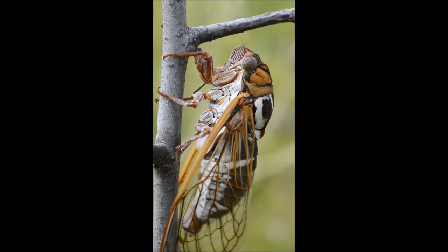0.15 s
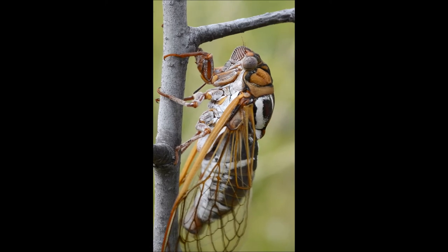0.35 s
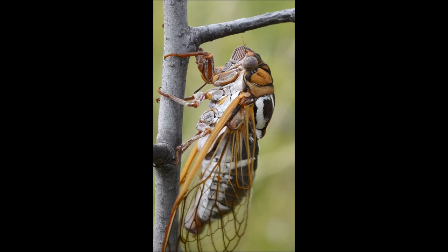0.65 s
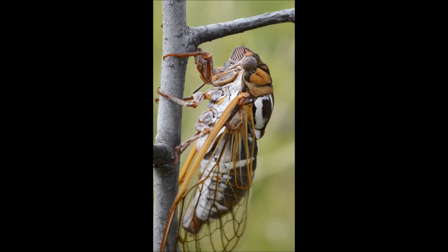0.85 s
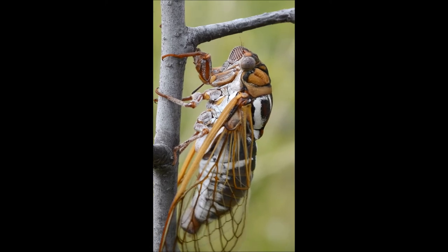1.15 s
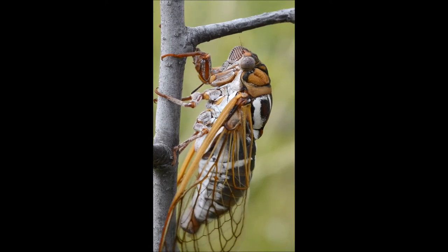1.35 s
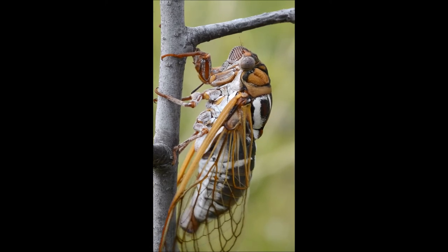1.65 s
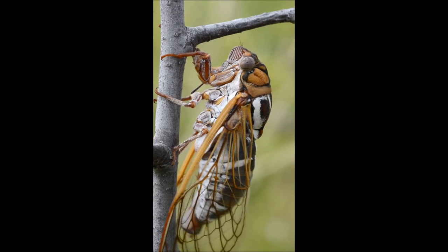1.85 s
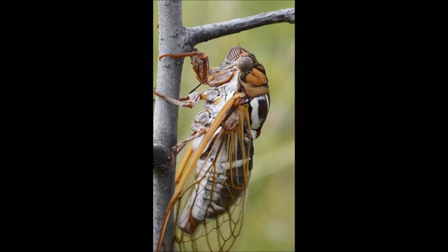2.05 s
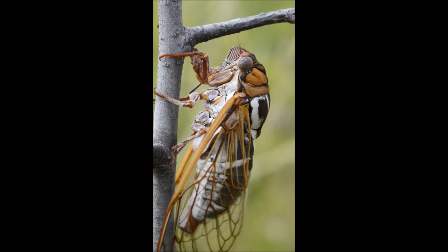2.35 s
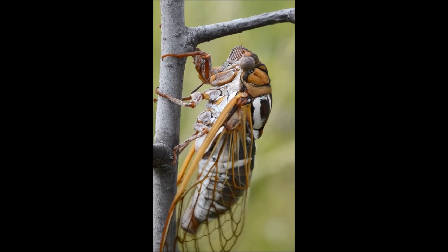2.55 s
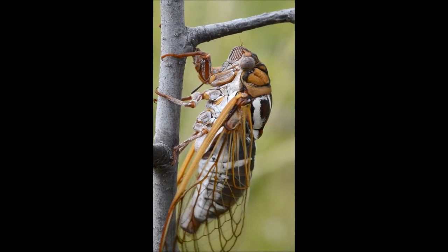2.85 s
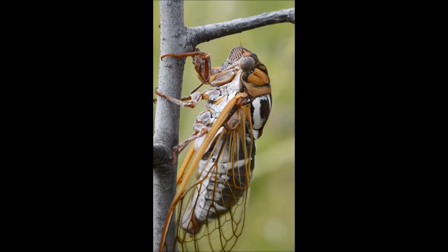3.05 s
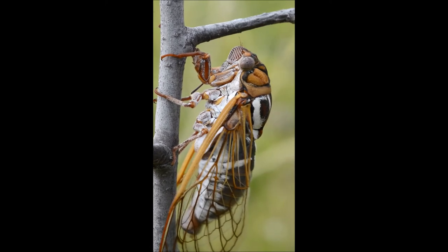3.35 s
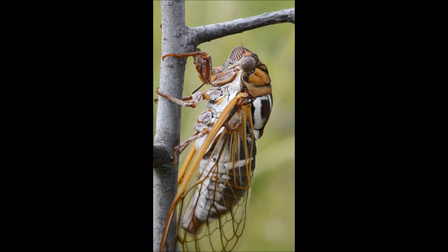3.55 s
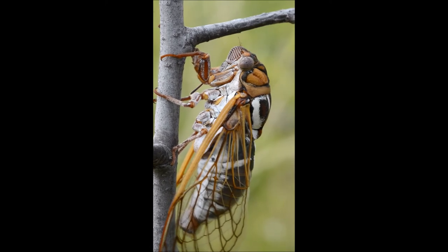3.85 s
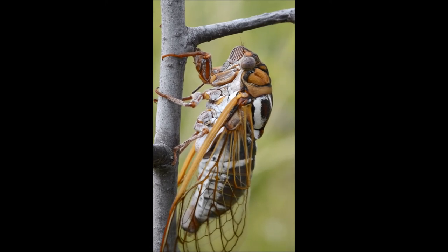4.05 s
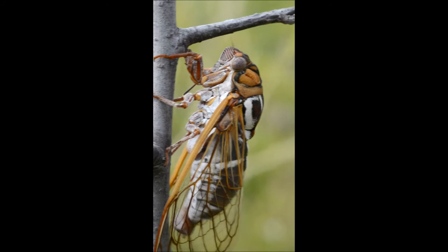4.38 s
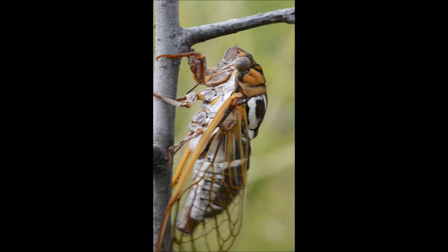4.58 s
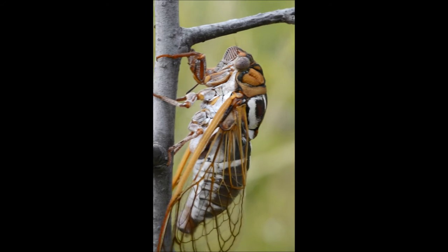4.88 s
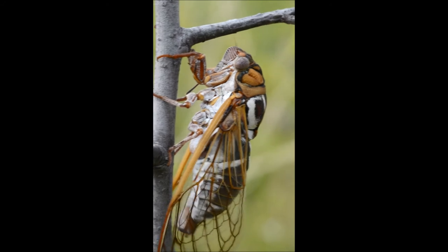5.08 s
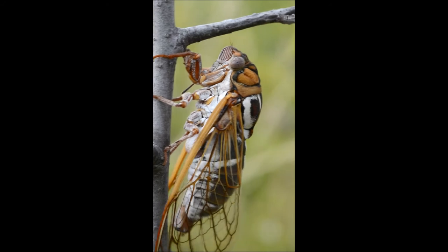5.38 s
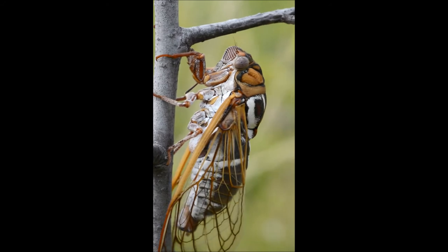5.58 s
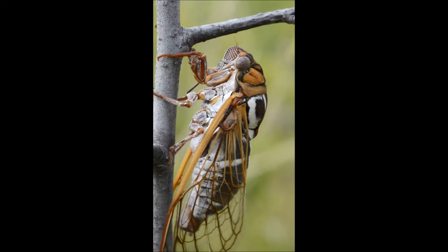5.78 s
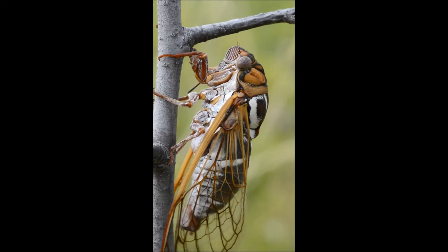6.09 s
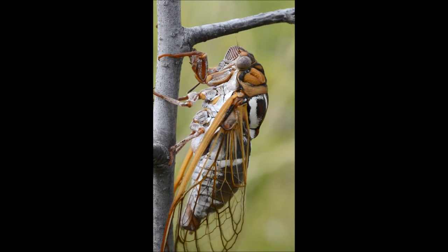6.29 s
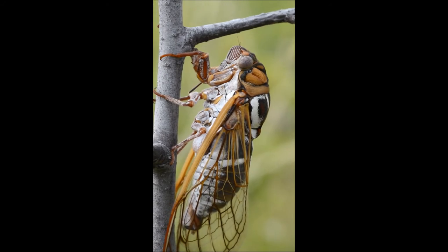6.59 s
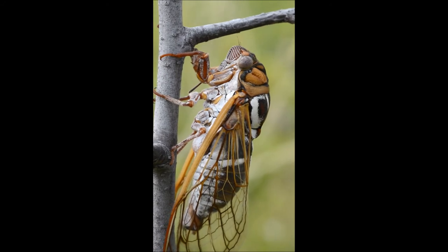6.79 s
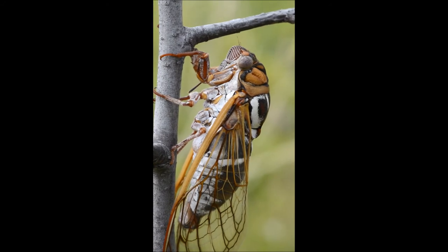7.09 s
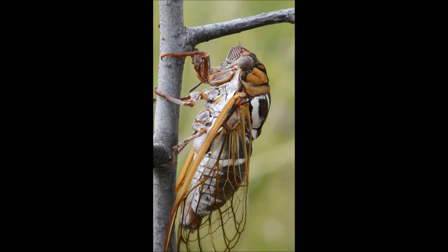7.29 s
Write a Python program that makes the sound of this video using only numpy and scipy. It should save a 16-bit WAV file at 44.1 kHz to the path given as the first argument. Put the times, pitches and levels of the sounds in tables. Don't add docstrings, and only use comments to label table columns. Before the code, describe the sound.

A cicada close by buzzes loud, harsh and fast-pulsing, slows near the end, stops with two small clicks, leaving faint distant cicadas.

```python
import sys
import numpy as np
from scipy import signal
from scipy.fft import rfft, irfft, next_fast_len
from scipy.io import wavfile

SR = 44100
rng = np.random.default_rng(int(sys.argv[2]) if len(sys.argv) > 2 else 0)


def convert_level_to_amplitude(level_db):
    exponent = np.asarray(level_db, float) / 20
    return 10 ** exponent


def inscribe(sig):
    pcm = np.round(np.clip(np.atleast_2d(sig).T, -1, 1) * 32767)
    wavfile.write(sys.argv[1], SR, pcm.astype(np.int16))


N = 327663


def evened(x):
    return x / np.sqrt(np.mean(x ** 2) + 1e-20)


def coloured(x, points):
    pitch_hz, level_db = np.transpose(points)
    size = next_fast_len(N)
    hz = np.fft.rfftfreq(size, 1 / SR)
    gain = convert_level_to_amplitude(np.interp(np.log(hz + 1), np.log(pitch_hz), level_db))
    return irfft(rfft(x, size) * gain, size)[..., :N]


def scatter(x, t60, start_s):
    t = np.arange(SR // 4) / SR
    echoes = rng.choice([-1., 1.], (2, len(t)))
    echoes *= (rng.random((2, len(t))) < .05) * (t > start_s)
    echoes *= convert_level_to_amplitude(-60 * t / t60)
    return signal.fftconvolve(x[None], echoes / np.linalg.norm(echoes[0]), axes=1)[:, :N]


# pitch_hz, level_db
AIR_COLOUR = [(30, -30), (80, -8), (160, -13), (400, -9), (700, -4), (1300, -9), (3000, -22), (4000, -28)]
# middle_s, half_length_s, rise_db
GUST = (6.78, .08, 6)


def hush():
    a, b = rng.standard_normal((2, N))
    middle_s, half_s, rise_db = GUST
    gust_db = rise_db * np.exp(-((np.arange(N) / SR - middle_s) / half_s) ** 2)
    air = coloured(np.array([a + 0.1 * b, a - 0.1 * b]), AIR_COLOUR)
    return convert_level_to_amplitude(-65 + gust_db) * evened(air)


# start_s, pitch_hz, level_db, fade_s (time to drop 60 dB)
KNOCK = (7.3935, 900, -35, .015)


def knock():
    start_s, pitch_hz, level_db, fade_s = KNOCK
    t = np.maximum(np.arange(N) / SR - start_s, 0)
    onset = np.minimum(t / 0.00086, 1)
    return convert_level_to_amplitude(level_db - 60 * t / fade_s) * np.sin(2 * np.pi * pitch_hz * t) * onset


# pitch_hz, level_db (per Hz)
CHORUS_COLOUR = [(590, -63), (1000, -26.5), (2480, -22), (3300, -15.5), (4100, 2.5), (5100, 5), (7050, 6),
                 (7650, -6), (9400, -38), (11400, -15), (15600, -25)]


def distant_chorus():
    a, b = rng.standard_normal((2, N))
    return evened(coloured(np.array([a + 0.032 * b, a - 0.15 * b]), CHORUS_COLOUR))


def ring(hz, width, crest_s=0.0003745, glide=0):
    t = np.arange(512) / SR
    start_s = max(crest_s - 1 / (np.pi * width), 0)
    age = np.pi * width * np.maximum(t - start_s, 0)
    since = t - crest_s
    return np.e * age * np.exp(-age) * np.cos(2 * np.pi * hz * (since + glide * since ** 2))


# delay_ms (from the brightest rib), low_db, middle_db, high_db, sheen_db
SLACK_RIBS = [(-2.1, -5, -7, -24, -10), (0, -2, 1.5, -20, -1), (2.05, -1, -10, -24, -11),
              (3.7, -12, -9, -23, -11)]
# delay_ms, low_db, middle_db, high_db, sheen_db
TIGHT_RIBS = [(-1.5, -12, -10, -6, -9), (0, -6, -8, 7.5, 5.5), (1.35, -3, 5.5, -3, 4),
              (2.9, 4.5, -7, -9, -3)]
# pitch_hz, width_hz, level_db
DRUM_MODES = [(4320, 1016, 1.5), (5583, 672, 1.5), (6995, 805, 0), (10330, 1080, 4)]
GLIDES = [110, 65, 94, 337]
TIGHT_SHIFT = [-0.094, 0.028, -0.032, 0.033]


def drum(at, tight, db, hollow_db, colour_db, jitter_ms=.08, uneven_db=.8, detune=.03):
    rows = np.array(SLACK_RIBS) + tight[:, None, None] * (np.array(TIGHT_RIBS) - np.array(SLACK_RIBS))
    chance = rng.standard_normal(rows.shape)
    delay_ms = rows[..., 0] + jitter_ms * chance[..., 0]
    where = np.round((at[:, None] + delay_ms / 1000) * SR).astype(int)
    where[(where < 0) | (where > N)] = N
    shape = rng.choice([-1, 1], rows.shape)

    def clicks(size):
        return np.bincount(where.ravel(), size.ravel(), N + 1)

    hollow = clicks(convert_level_to_amplitude((db + hollow_db)[:, None] + rows[..., 1]))
    out = signal.oaconvolve(hollow, ring(2440, 1300))[:N]
    for k, (hz, width, mode_db) in enumerate(DRUM_MODES):
        rib_db = rows[..., k + 1] + uneven_db * chance[..., k + 1]
        size = convert_level_to_amplitude(db[:, None] + mode_db + colour_db[k] + rib_db)
        for bend in (-1, 1):
            chosen = shape[..., k + 1] == bend
            for share, shift in ((1 - tight, 0), (tight, TIGHT_SHIFT[k])):
                click = ring(hz * (1 + detune * bend + shift), width, glide=GLIDES[k])
                out += signal.oaconvolve(clicks(size * share[:, None] * chosen), click)[:N]
    return out


# place_in_pump (0-1), lead_ms
LEAD = [(.05, 3.3), (.2, 4.8), (.35, 6.1), (.5, 4.5), (.8, 4.3)]
HIDDEN_DRUM_DB = [-1, -2, 0, -7]


def song(at, pumps, swing, db, hollow_db, drag_ms=1.75, rest_ms=5.7, snap=6., threshold=.33):
    drag = drag_ms * np.minimum(swing, .9) * np.cos(2 * np.pi * (pumps - .42))
    at = at + (drag + .15 * rng.standard_normal(len(at))) / 1000
    place, pump_lead_ms = np.transpose(LEAD)
    pump_lead_ms = np.interp(pumps % 1, place, pump_lead_ms, period=1)
    lead_ms = rest_ms + np.minimum(swing, 1) * (pump_lead_ms - rest_ms)

    def tightness(top):
        pull = swing * np.cos(2 * np.pi * (pumps - top))
        return 1 / (1 + np.exp(snap * (threshold - pull)))

    facing = drum(at, tightness(.04), db, hollow_db, np.zeros(4))
    hidden = drum(at - lead_ms / 1000, tightness(.09), db, hollow_db, HIDDEN_DRUM_DB)
    return facing + hidden


# pitch_hz, width_hz, level_db
AIR_SAC = [(4543, 210, -46.5), (5960, 160, -47.5), (11620, 300, -43)]
# pitch_hz, level_db
BODY = [(300, -16.5), (1500, -6), (1950, -5), (3000, -7.5), (3600, 4.5), (5150, 1), (6250, -0.5),
        (7500, -1), (8900, -0.5), (10500, -8.5), (11600, -3.5), (13000, -3), (14200, -2.5), (15600, -4.5)]


def through_body(x):
    sac = sum(convert_level_to_amplitude(db) * ring(hz, width, crest_s=0) for hz, width, db in AIR_SAC)
    return coloured(x + signal.oaconvolve(x, sac)[:N], BODY)


# pitch_hz, level_db
FAR_AIR = [(2000, -28), (3400, -13), (4200, -25), (4800, 0), (5800, -4), (6800, 1.5), (7600, -2),
           (12500, -10.5), (15000, -10)]


def far_cicada():
    at = np.arange(0, N / SR, 1 / 101.5)
    pumps = (at - 6.977) * 16.42
    strokes = song(at, pumps, .55 + 0 * at, 0 * at, -49)
    sung = coloured(through_body(strokes), FAR_AIR)
    smear = scatter(sung, .08, .001)
    return evened(.5 * sung + smear.mean(0) + .2 * smear)


# time_s, strokes_per_s, pumps_per_s (of the abdomen)
PACE = [(0, 102.77, 17.12), (1.1, 102.85, 16.61), (2.2, 102.16, 16.75), (3.1, 101.71, 16.39),
        (3.7, 100.25, 16.71), (4.3, 99.92, 16.32), (4.8, 96.5, 15.67), (5.15, 96.79, 15.56),
        (5.45, 89.81, 14.19), (5.8, 88.77, 11.44), (6.2, 83.45, 12.03), (6.55, 81.69, 11.99),
        (6.9, 68.8, 12.02)]
# time_s, effort_db, pump_swing (0-1), hollow_db (undertone)
EFFORT = [
    (0, -14.5, 0.87, -26),
    (2.5, -15, 0.89, -22.5),
    (4.9, -15, .87, -19.5),
    (5.348, -15, .52, -16.5),
    (5.85, -15.5, .53, -16),
    (6.25, -16, .1, -13.5),
    (6.5, -16.5, .07, -13.5),
    (6.8, -16.5, 0.2, -12),
    (6.885, -18.5, .2, -12.5),
]
# time_s, effort_db
STRAYS = [
    (6.896, -21),
    (6.937, -21.5),
]


def near_cicada():
    stop_s, stroke_start, pump_start = 6.888, -.03, .82
    s, stroke_rate, pump_rate = np.transpose(PACE)
    t = np.arange(0, stop_s, 1 / 1000)
    strokes = stroke_start + np.cumsum(np.interp(t, s, stroke_rate)) / 1000
    pumps = pump_start + np.cumsum(np.interp(t, s, pump_rate)) / 1000
    at = np.interp(np.arange(np.ceil(strokes[-1])), strokes, t)
    s, *controls = np.transpose(EFFORT)
    effort_db, swing, hollow_db = (np.interp(at, s, c) for c in controls)
    singing = song(at - .0005, np.interp(at, t, pumps), swing, effort_db, hollow_db)
    stray_s, stray_db = np.transpose(STRAYS)
    strays = drum(stray_s - .0004, np.zeros(2), stray_db, -17, [0.0, 1.0, 4, 1.5])
    return convert_level_to_amplitude(3) * through_body(singing + strays)


def scene():
    near = near_cicada()
    left, right = scatter(near, .025, .0003)
    apart = coloured(left, [(3000, -23.5), (4500, -18.5), (8000, -16.0), (14000, -7.0)])
    placed = near * convert_level_to_amplitude([[.4], [-.4]])
    echoes = convert_level_to_amplitude(-12.5) * right + np.array([apart, -apart])
    far = convert_level_to_amplitude(-24.5) * (.8 * far_cicada() + .6 * distant_chorus())
    return placed + echoes + far + hush() + knock()


def top_cut(x):
    return signal.sosfilt(signal.butter(12, 15740, fs=SR, output="sos"), x)


def record(dry):
    edge_hz = 15850
    spill = np.clip(dry, -1.08, 1.05) - dry
    flat = dry + .9 * spill.mean(0) + .1 * spill
    low_pass = signal.firwin(511, edge_hz, window=("kaiser", 9), fs=SR)
    flat = signal.oaconvolve(flat, low_pass[None], "same")
    flat += (np.clip(flat, -1, 1) - flat).mean(0)
    return top_cut(flat)


dry = scene()
out = record(dry)
inscribe(out)
```